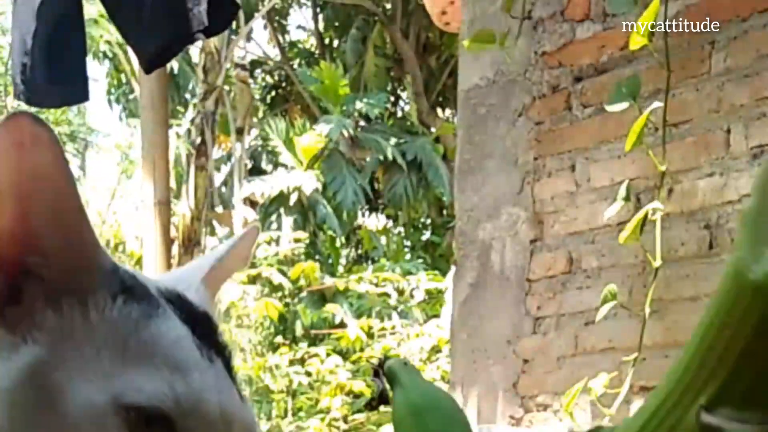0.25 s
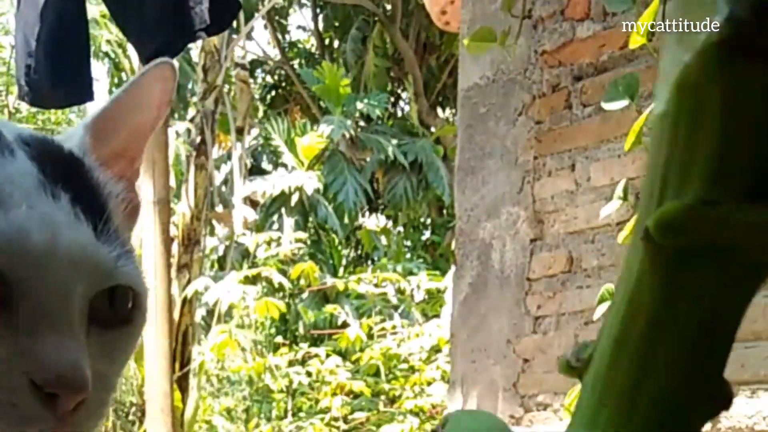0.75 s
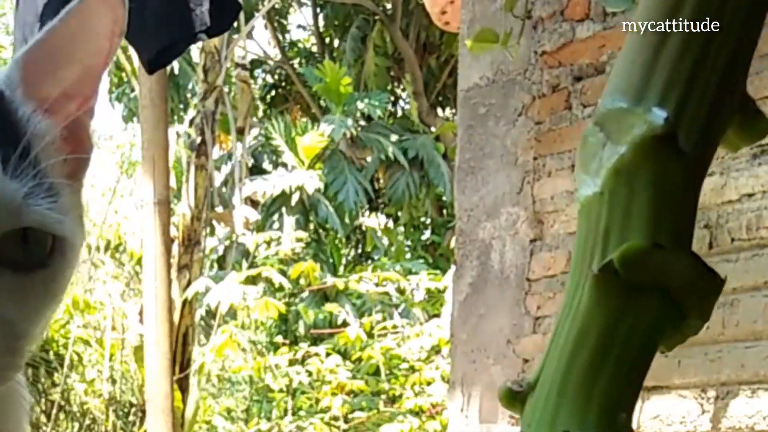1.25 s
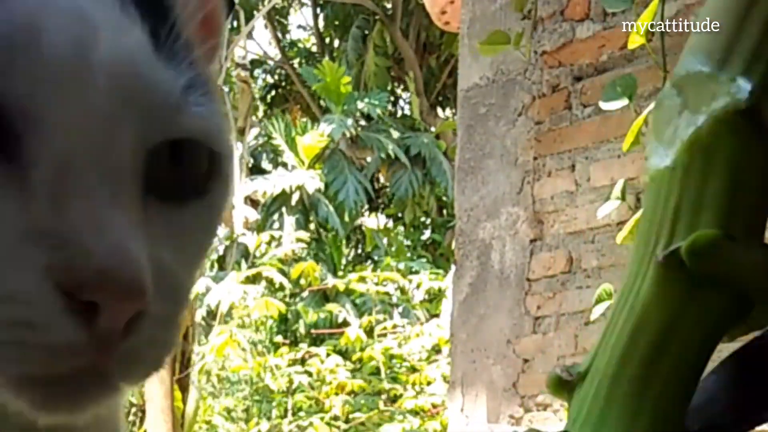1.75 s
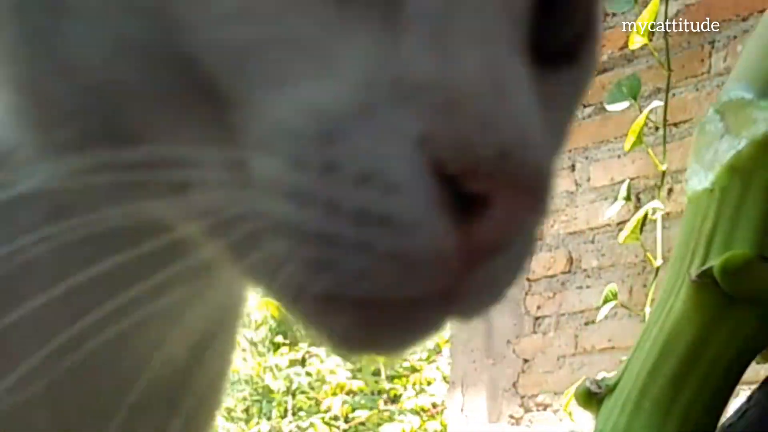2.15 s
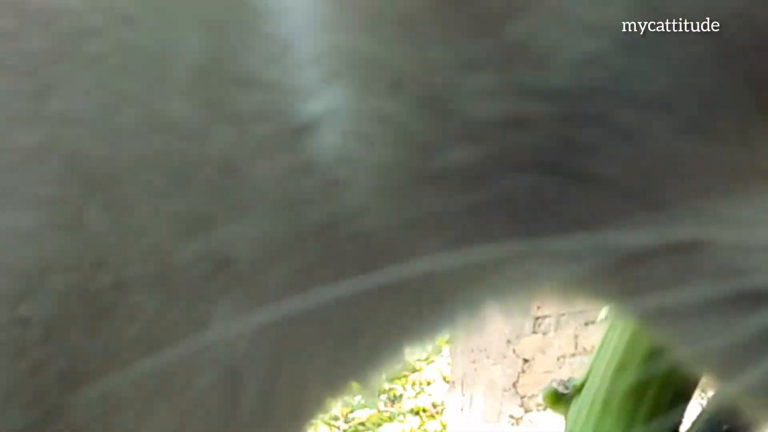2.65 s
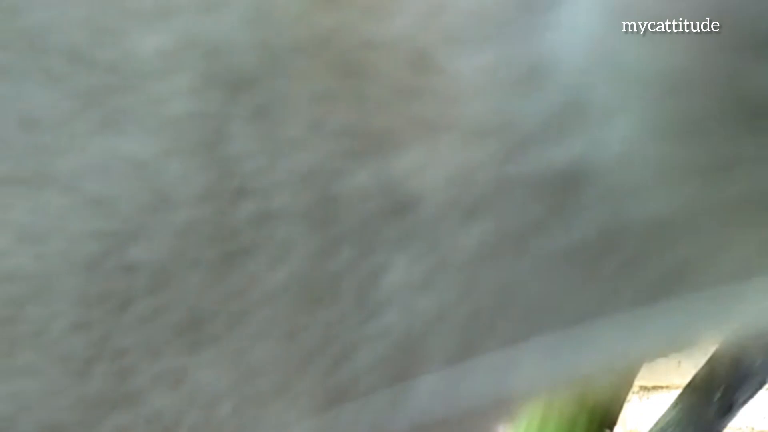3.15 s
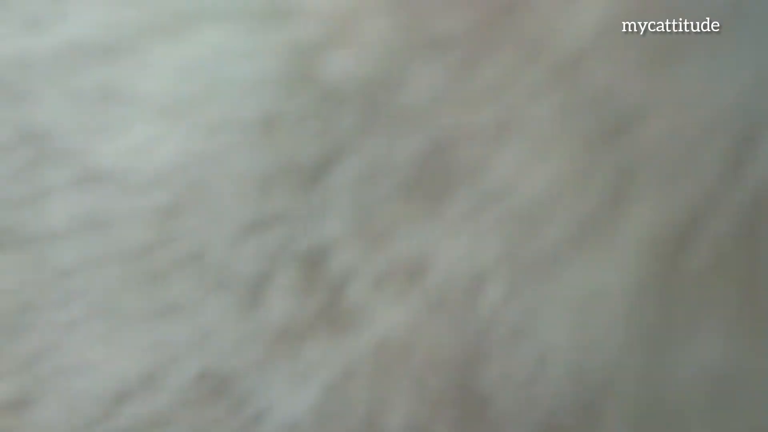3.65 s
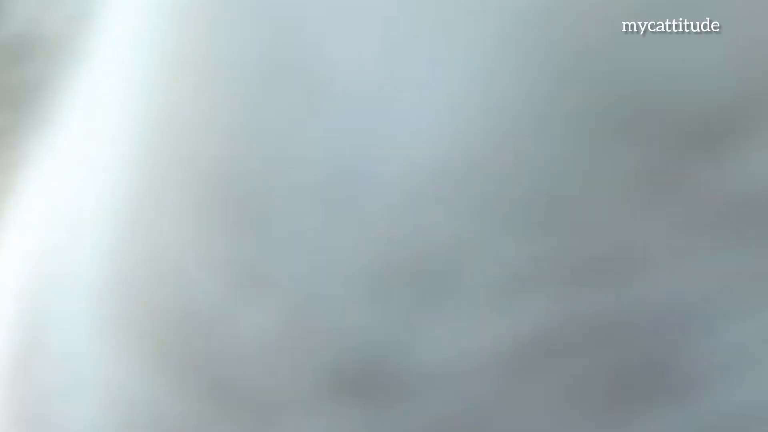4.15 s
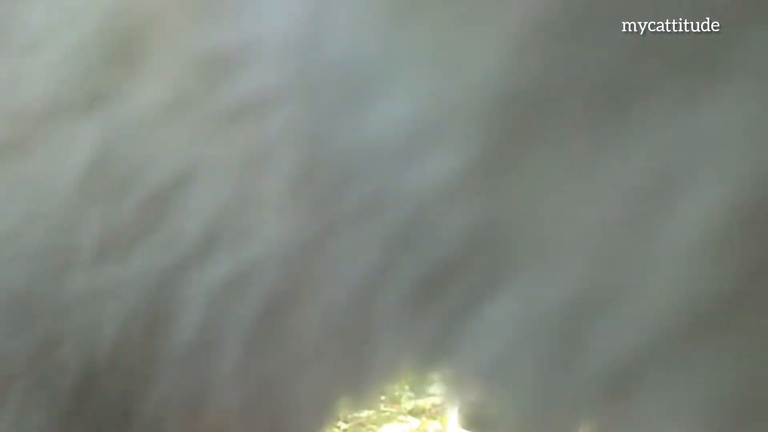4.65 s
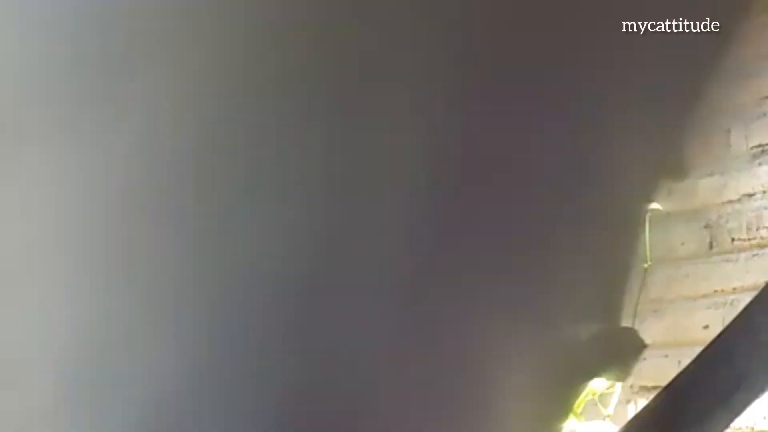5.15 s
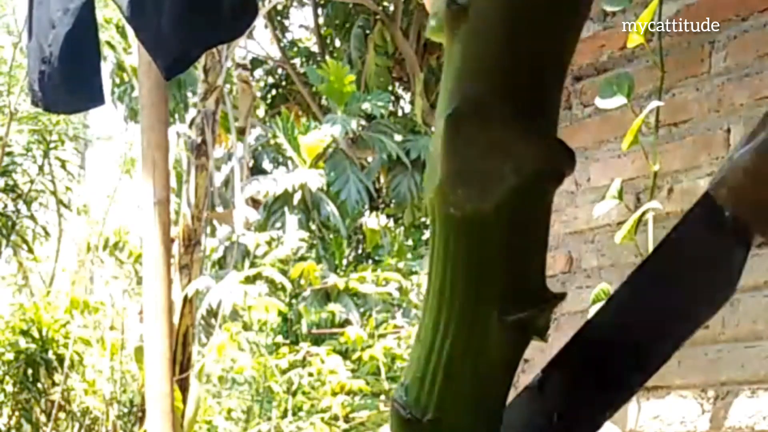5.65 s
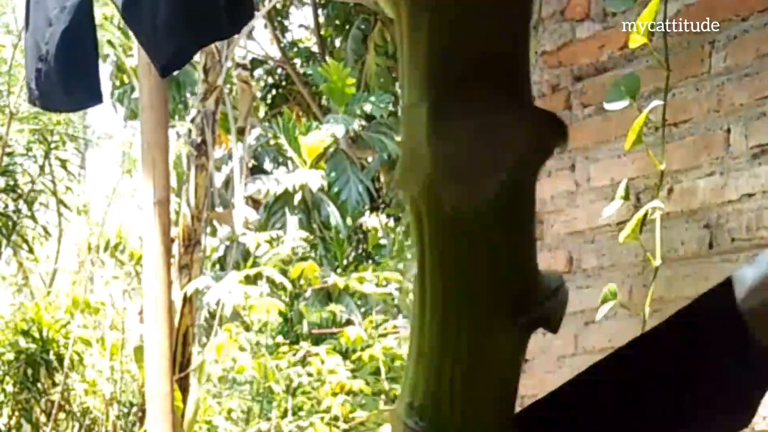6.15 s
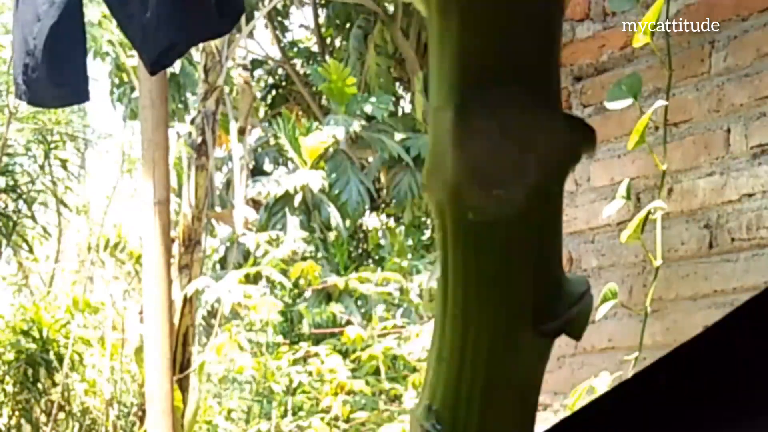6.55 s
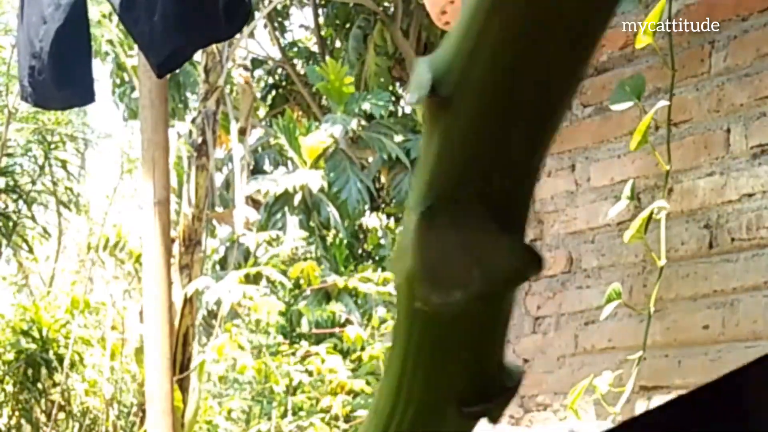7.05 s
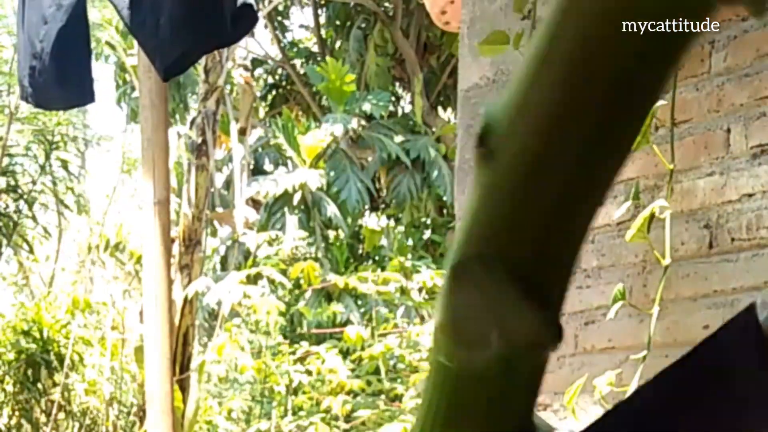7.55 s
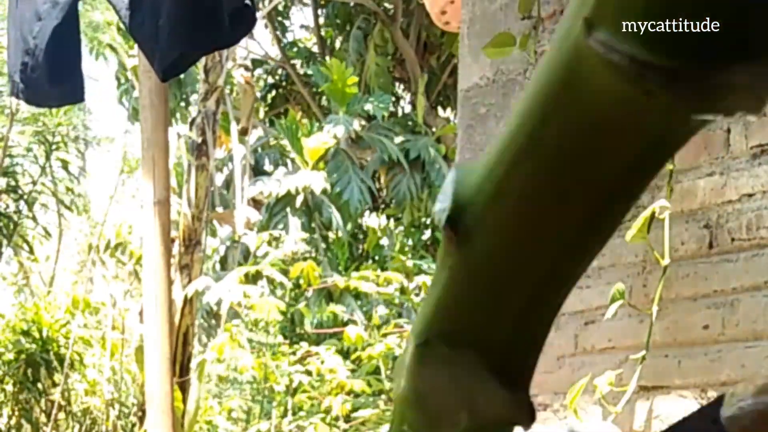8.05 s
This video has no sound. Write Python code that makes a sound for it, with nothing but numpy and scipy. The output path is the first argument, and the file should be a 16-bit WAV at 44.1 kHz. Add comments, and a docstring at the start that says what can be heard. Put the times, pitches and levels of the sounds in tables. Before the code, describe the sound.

A quiet garden yard, birds a few steps away, plant handling right at the microphone. A low hen cluck opens at 0.05 s while chicks peep in quick gliding falls, about 4.5-5.5 kHz down to 3, clearest until 1.8 s. Grainy rustles and small dry ticks come and go throughout. Rough, pulsing clucks follow at 1.5, 2.7, 3.3 and 3.5 s; peeps from 2.3 s are softer, blurred by leaves. Around 4.0-4.2 s come a cluck, sharp ticks, soft bumps and a higher, shorter cluck. Brief chips and peeps cluster at 5.3-5.8 s, weak clucks near 5.7-6.0, a fuller one at 6.2. A sharp tick at 6.35 leads into a woody, wet crunch of rapid snaps at 6.53-6.75 s. Sparse rubbing continues; peeps return from 7.9 and a last rising cluck at 8.15 s. Low handling rumbles swell over a faint steady hush.

```python
"""Hen and chicks in a garden yard

A hen clucks low and rough beside a brick wall: uneven pulses ring her throat and beak.
Her chicks peep in gliding, falling whistles, blurred by foliage, and flick out short chips.
Close by, a green stalk is handled and cut: grainy noise rustles, short bursts tick, and once it crunches
through as snaps ring the stalk. A cat brushes past the microphone, heard in the firmer strokes.
Soft bumps, a low rumble that swells with microphone movement and a faint outdoor hush complete the scene."""
import sys
import numpy as np
from scipy import signal
from scipy.fft import rfft, irfft, next_fast_len
from scipy.io import wavfile
from scipy.ndimage import uniform_filter1d

SR = 44100
rng = np.random.default_rng(int(sys.argv[2]) if len(sys.argv) > 2 else 0)


def inscribe(sig):
    """Save sig as 16-bit PCM at rate SR to the path in sys.argv[1].

    A 1-D sig is mono; a 2-D sig holds one channel per row.
    Samples are clipped to [-1, 1] before scaling.
    """
    pcm = np.round(np.clip(np.atleast_2d(sig).T, -1, 1) * 32767)
    wavfile.write(sys.argv[1], SR, pcm.astype(np.int16))


N = 366471
TIME = np.arange(N) / SR   # seconds


def from_db(db):
    """Turn decibels into a gain."""
    return 10 ** (np.asarray(db) / 20)


def rms_one(x):
    """Scale a sound so that its average strength (rms) is 1."""
    return x / np.sqrt(np.mean(x ** 2) + 1e-20)


def in_time(rows):
    """Draw straight lines between the rows of a table and read each column at every sample."""
    times, *columns = np.transpose(rows)
    return [np.interp(TIME, times, column) for column in columns]


def drift(rate_hz, size=N):
    """A random wandering around 0 with a spread of about 1; new targets come at rate_hz."""
    at = np.arange(size) * rate_hz / SR
    count = int(at[-1]) + 2
    return 1.2 * np.interp(at, np.arange(count), rng.standard_normal(count))


def colour(x, spectrum):
    """Filter a noise-like sound to follow a spectrum (pitch_hz, level_db), then set its rms to 1."""
    points_hz, points_db = np.transpose(spectrum)
    size = next_fast_len(N)
    log_hz = np.log(np.arange(size // 2 + 1) * SR / size + 1)
    below = np.maximum(np.log(points_hz[0]) - log_hz, 0)
    above = np.maximum(log_hz - np.log(points_hz[-1]), 0)
    # beyond the first and last points the level falls about 28 dB per octave
    gain_db = np.interp(log_hz, np.log(points_hz), points_db) - 40 * (below + above)
    return rms_one(irfft(rfft(x, size) * from_db(gain_db), size)[..., :N])


def noise(spectrum):
    """Steady noise with the given spectrum and an rms of 1."""
    return colour(rng.standard_normal(N), spectrum)


def resonate(x, hz, width_hz):
    """Ring a resonance that passes its own centre pitch unchanged."""
    r = np.exp(-np.pi * width_hz / SR)
    top = np.array([1, 0, -1]) * (1 - r * r) / 2
    bottom = [1, -2 * r * np.cos(2 * np.pi * hz / SR), r * r]
    return signal.lfilter(top, bottom, x + 1e-18)


def burst(start_s, t60_s):
    """An envelope that jumps to 1 and dies away by 60 dB in t60_s."""
    out, start = np.zeros(N), int(start_s * SR)
    age = TIME[:min(int(2 * t60_s * SR), N - start)]
    out[start:start + len(age)] = from_db(-60 * age / t60_s)
    return out


def swells(rows, attack_s, release_s):
    """Joint envelope of movements (start_s, length_s, level_db) that each rise, hold and die away."""
    power = np.zeros(N)
    for start, length, db in rows:
        at = np.arange(max(int(start * SR), 0), min(int((start + length + .5) * SR), N))
        age = TIME[at] - start
        rise = np.minimum(age / attack_s, 1)
        fade = np.exp(-np.maximum(age - length, 0) / release_s)
        power[at] += (from_db(db) * rise * fade) ** 2
    return np.sqrt(power)


def call_span(start, length, edge_s):
    """Sample numbers of a call, its progress from 0 to 1, and its soft-edged gate."""
    first, last = start - edge_s / 2, start + length + edge_s / 2
    at = np.arange(max(int(first * SR), 0), min(int(last * SR), N))
    to_edge_s = np.minimum(TIME[at] - first, last - TIME[at])
    gate = np.sin(np.pi / 2 * np.clip(to_edge_s / edge_s, 0, 1)) ** 2
    return at, np.clip((TIME[at] - start) / length, 0, 1), gate


# echoes from ground and wall, before each source's own echo setting: delay_s, level_db
ECHOES = [(.0068, -16), (0.0112, -16), (0.024, -22.5), (0.033, -19)]


def yard(x, echo_db, tail_db, t60_s):
    """Add echoes from ground and wall and a short, fading scatter from the foliage."""
    age = TIME[:SR // 2]
    response = rng.standard_normal(len(age)) * from_db(-60 * age / t60_s) * np.minimum(age / 0.012, 1)
    response *= from_db(tail_db) / np.linalg.norm(response)
    for delay, db in ECHOES:
        response[int(delay * SR)] += from_db(db + echo_db)
    return x + signal.fftconvolve(x, response)[:N]


# low rumbles as the microphone is moved: start_s, length_s, level_db
MICROPHONE_MOVES = [(.15, 0.24, -69), (.6, 0.24, -59), (1.2, 0.19, -66.5), (2.06, 0.14, -60.5),
                    (2.42, 0.14, -65.5), (2.85, 0.13, -62.5), (3.32, .12, -60), (3.54, 0.1, -57),
                    (4.0, 0.27, -63), (4.62, 0.16, -67), (5.04, 0.38, -65), (5.68, 0.2, -59.5),
                    (6.0, 0.46, -65.5), (6.5, 0.36, -62.5), (7.02, 0.31, -59.5), (7.5, 0.093, -63.5),
                    (8.1, 0.07, -63)]
# tone colour of the rumble: pitch_hz, relative level_db
RUMBLE_COLOUR = [(25, -43.5), (45, -2.5), (66, 0), (85, -3), (125, -13), (200, -19.5), (330, -30.5)]
# tone colour of the distant hush: pitch_hz, relative level_db
HUSH_COLOUR = [(88, -19), (150, 3.5), (248, -11), (295, -1.5), (375, -23), (446, -4), (519, -17), (588, -1),
               (667, -5), (889, 2), (1110, -5), (1540, -6), (3000, -27.5), (3900, -91), (6600, -120)]


def outdoors(floor_db=-71, hush_db=-69.5):
    """Low noise swells whenever the microphone moves, over a steady distant hush."""
    moves = swells(MICROPHONE_MOVES, attack_s=0.023, release_s=0.041)
    rumble = np.hypot(from_db(floor_db), moves)
    return rumble * noise(RUMBLE_COLOUR) + from_db(hush_db) * noise(HUSH_COLOUR)


# soft bumps on the microphone: start_s, level_db before smoothing, length_s (time to fall 30 dB)
MICROPHONE_BUMPS = [(4.054, -38, 0.073), (4.069, -47, 0.082), (4.112, -47, 0.036), (4.142, -44, 0.039),
                    (4.164, -46.5, 0.11), (6.528, -36.5, 0.13), (6.645, -49, 0.092)]
# tone colour of the bumps: pitch_hz, relative level_db
BUMP_SPECTRUM = [(40, -7), (110, 2), (280, -7.5), (800, -5), (1600, -15.5), (4000, -35), (9000, -38)]


def bumps():
    """Dull knocks carried through the microphone's body: dark noise under a soft-edged, fading envelope."""
    pressure = sum(from_db(db) * burst(start, 2 * length) for start, db, length in MICROPHONE_BUMPS)
    return noise(BUMP_SPECTRUM) * uniform_filter1d(pressure, size=260)   # smoothed over about 6 ms


def fibres(patchy_db=3.5, snaps_per_s=8.3, snap_size=8.1):
    """Friction noise in which each band flares on its own and tiny snaps ring at scattered pitches."""
    out, edges_hz = 0, np.geomspace(250, 15000, 23)
    for low, high in zip(edges_hz, edges_hz[1:]):
        snaps = np.zeros(N)
        at = rng.integers(0, N, int(snaps_per_s * N / SR))   # snaps_per_s counts each band
        snaps[at] = snap_size * rng.laplace(size=len(at))
        slips = rng.standard_normal(N) * from_db(patchy_db * drift(90)) + snaps
        band = signal.butter(2, [low, high], "band", fs=SR, output="sos")
        out = out + signal.sosfilt(band, slips)
    return out


# light, steady rubbing of stalk and leaves: time_s, hiss level_db, rasp level_db
LIGHT_RUBBING = [(0, -69, -61), (.25, -61.5, -70), (1.15, -64, -72), (1.5, -76.5, -78), (1.75, -70, -71),
                 (1.98, -95, -100), (2.4, -77, -73), (3.68, -80.5, -84), (4.1, -63.5, -78),
                 (4.52, -78, -76), (4.7, -92, -102), (5.3, -70.5, -72.5), (6.88, -66.5, -76.5),
                 (7.58, -91, -90), (7.77, -64, -69), (7.89, -81.5, -78), (8.08, -64, -72), (8.31, -72, -64)]
# firmer strokes of hand, blade and fur: start_s, length_s, hiss level_db, rasp level_db
FIRM_STROKES = [(0.183, 0.15, -65.5, -59), (0.413, .06, -61, -86), (0.54, 0.028, -58.5, -85),
                (0.714, 0.086, -60.5, -60), (0.867, 0.2, -57.5, -54), (1.265, 0.076, -66.5, -60),
                (1.348, 0.11, -71, -62), (1.607, 0.027, -52, -67), (1.66, 0.088, -79, -64),
                (2.302, 0.087, -72, -71), (2.54, 0.091, -67.5, -71), (2.709, 0.075, -65.5, -59.5),
                (2.875, 0.057, -61.5, -64), (3.206, .13, -71, -66), (3.443, 0.18, -69.5, -81),
                (3.754, 0.12, -64, -75), (4.015, .09, -60, -54), (4.144, 0.044, -59, -59),
                (4.42, 0.15, -68, -83), (4.779, 0.078, -68.5, -73.5), (5.204, 0.071, -58, -59.5),
                (5.457, .07, -61.5, -74), (5.655, 0.086, -61, -60), (5.859, 0.17, -64, -76),
                (6.071, 0.11, -60, -63), (6.303, 0.046, -62, -63), (6.445, 0.029, -54.5, -75),
                (6.526, 0.13, -66, -75), (6.746, 0.11, -56, -68), (7.083, .17, -61.5, -79),
                (7.365, 0.11, -72.5, -78), (7.64, 0.073, -59.5, -63.5)]
# tone colours of the hiss, the lower rasp and the bright crackles: pitch_hz, relative level_db
HISS_COLOUR = [(1470, -15.5), (2500, -4), (3140, -59), (4280, -31), (4710, -7), (6800, 6.5), (8230, 8),
               (10800, -5), (11200, -2.5), (14500, -7)]
RASP_COLOUR = [(300, -7.5), (900, -1), (1500, 1), (2700, 0), (3800, -0.5), (6000, -23)]
CRACKLE_COLOUR = [(2000, -10.5), (5000, -6.5), (8000, 3.5), (14000, -8.5)]


def rubbing(grain_db=0.5, stutter_db=1.3, spread=0.42, crackle_db=-10.0):
    """Fibres catch and slip: grainy hiss, a little different at each ear, with crackles, over a lower rasp."""
    light_hiss_db, light_rasp_db = in_time(LIGHT_RUBBING)
    attack_s, release_s = 0.029, 0.018
    hiss_rows = [(start, length, db) for start, length, db, _ in FIRM_STROKES]
    rasp_rows = [(start, length, db) for start, length, _, db in FIRM_STROKES]
    hiss_level = np.hypot(from_db(light_hiss_db), swells(hiss_rows, attack_s, release_s))
    rasp_level = np.hypot(from_db(light_rasp_db), swells(rasp_rows, attack_s, release_s))

    grains = from_db(grain_db * drift(1500) + stutter_db * drift(70))
    friction = fibres() * grains
    catches = (rng.random(N) < 22 / SR) * rng.uniform(.3, 1, N) ** 2   # about 22 a second
    catch_level = signal.lfilter([1], [1, -.99], catches + 1e-18)   # each dies away in a few ms
    crackle = colour(rng.standard_normal(N) * catch_level, CRACKLE_COLOUR)
    side_colour = [(4000, -34.5), (6500, 8.5), (8500, 13.5), (14000, -3.0)]   # pitch_hz, level_db
    side = colour(rng.standard_normal(N) * grains, side_colour)

    hiss = colour(friction, HISS_COLOUR) + from_db(crackle_db) * crackle
    hiss = hiss + spread * side * [[1], [-1]]   # opposite signs left and right
    return hiss_level * hiss + rasp_level * colour(friction, RASP_COLOUR)


# short scuffs of leaves and skin, and at 1.79 s a soft low tone that joins a chick's chip: middle_s, level_db,
# length_s (half of the whole swell), pitch_hz
LEAF_SCUFFS = [(0.76, -65, 0.04, 1570), (0.932, -50, 0.079, 2590), (1.028, -67, 0.069, 1560),
               (1.351, -56.5, 0.12, 2610), (1.661, -55.5, 0.057, 1300), (1.712, -60, 0.074, 1600),
               (1.79, -64, .03, 785), (2.324, -63.5, 0.09, 1144), (2.928, -68, 0.16, 1760),
               (3.59, -55.5, .03, 1740), (4.147, -50, 0.0084, 805), (7.704, -57, 0.029, 1710),
               (7.794, -62, 0.08, 1670)]


def scuffs(width_hz=440.0, grain_db=4.0):
    """Grainy slips that swell and fade in one resonance."""
    out = np.zeros(N)
    for middle, db, length, hz in LEAF_SCUFFS:
        at = np.flatnonzero(np.abs(TIME - middle) < length)
        slips = rng.standard_normal(len(at)) * from_db(grain_db * drift(307, len(at)))
        ringing = resonate(resonate(slips, hz, width_hz), hz, width_hz)
        out[at] += from_db(db) * np.hanning(len(at)) * rms_one(ringing)
    return out


# dry ticks of the stalk: start_s, level_db of the bright band, pitch_hz of its centre
STALK_TICKS = [(.879, -47, 8300), (1.05, -42.5, 6380), (1.457, -46, 9000), (1.6267, -50.5, 9500),
               (2.8593, -52, 8100), (4.0572, -33.5, 7650), (4.085, -40.5, 7500), (4.1695, -49, 6550),
               (5.1953, -42, 8400), (5.257, -46, 7330), (5.517, -40.5, 8300), (6.2833, -49, 8720),
               (6.3522, -32, 7800), (6.3599, -39, 6740), (7.229, -47.5, 10640), (7.233, -61, 9200),
               (7.293, -51.5, 9400), (7.646, -52.5, 5370), (7.6718, -57, 6800)]
# tone colour shared by the ticks and the cracks of the cut: pitch_hz, relative level_db
CRACK_COLOUR = [(800, -7.5), (2000, 2), (4000, -2.5), (7500, 1.5), (10000, -8.5), (14000, -18)]


def ticks(t60_s=0.015, width_hz=870.0, body_db=-5.5):
    """Brief cracks: noise that dies away at once, each brightest in a band of its own."""
    out, body = np.zeros(N), noise(CRACK_COLOUR)
    for start, db, hz in STALK_TICKS:
        bright = rms_one(resonate(body, min(hz, 13000), width_hz))
        out += from_db(db) * burst(start, t60_s) * (bright + from_db(body_db) * body)
    return out


# fibres snapping under the blade: start_s, strength level_db (before crack, tear and ringing gains)
FIBRE_SNAPS = [(6.533, -33), (6.538, -25), (6.542, -24), (6.548, -29), (6.568, -46), (6.591, -40),
               (6.591, -30), (6.607, -23.5), (6.623, -28.5), (6.627, -25), (6.637, -30.5), (6.6462, -21.5),
               (6.649, -46), (6.664, -31), (6.669, -21.5), (6.68, -29.5), (6.705, -29), (6.706, -31.5),
               (6.744, -38)]
# ringing tones of the hollow stalk: pitch_hz, gain level_db, t60_s (time to fall 60 dB)
STALK_TONES = [(151, -26, 0.1), (333, -26.5, 0.062), (593, -10.5, 0.011), (985, 1.5, 0.0076),
               (1170, 1.5, 0.018), (1292, -3.5, 0.012), (1680, -10.5, 0.0059), (3230, -25, 0.0073),
               (4440, -13, 0.0019)]


def cut(crack_db=-20.0, crack_t60_s=0.036, tear_db=-16.5, tear_t60_s=0.057):
    """Each snap cracks and rings the hollow stalk; smaller fibres tear after it."""
    at = [int(start * SR) for start, _ in FIBRE_SNAPS]
    sizes = from_db([db for _, db in FIBRE_SNAPS])
    tear_level = sum(from_db(db) * burst(start, tear_t60_s) for start, db in FIBRE_SNAPS)
    tearing = from_db(tear_db) * rng.standard_normal(N) * tear_level
    crack_level = sum(from_db(db) * burst(start, crack_t60_s) for start, db in FIBRE_SNAPS)
    out = from_db(crack_db) * noise(CRACK_COLOUR) * crack_level
    for k, (hz, db, t60_s) in enumerate(STALK_TONES):
        clicks = tearing / 2
        clicks[at] += sizes * from_db(rng.normal(0, 2.5, len(at)))   # every tone is struck a little differently
        r, w = from_db(-60 / (t60_s * SR)), 2 * np.pi * hz / SR
        ringing = signal.lfilter([0, np.sin(w)], [1, -2 * r * np.cos(w), r * r], clicks + 1e-18)
        out += (-1) ** k * from_db(db) * ringing
    return out


def whistles(calls, waver, flutter_db, octave_db, rasp=0.43, beak_hz=6500.0, beak_width_hz=2100):
    """Gliding tones, purest on top, raspy as they fall or strain high; the beak passes the octave in one band."""
    tone, octave = np.zeros((2, N))
    for at, hz, envelope in calls:
        strain = (hz - 4700) / 800   # starts above 4700 Hz, full 800 Hz higher
        slack = np.clip(np.maximum(3.5 * (1 - hz / hz.max()), strain), .15, 1)
        phase = 2 * np.pi * np.cumsum(hz * (1 + waver * slack * drift(253.7, len(at)))) / SR
        flutter = from_db(flutter_db * slack * drift(93, len(at)))
        level = envelope * flutter * (1 + rasp * slack * drift(600, len(at)))
        tone[at] += level * np.sin(phase)
        octave[at] += level * np.sqrt(slack) * np.sin(2 * phase)
    octave = resonate(resonate(octave, beak_hz, beak_width_hz), beak_hz, beak_width_hz)
    return tone + from_db(octave_db) * octave


# the chicks wander off behind the foliage and come back: time_s, direct level_db, scattered level_db
BEHIND_LEAVES = [(0, 0, -10), (1.9, 0, -10), (2.45, -1, -5), (2.9, -5, -1), (4.6, -5, -1), (5.2, -3, -2),
                 (6.0, -5, -1), (7.8, -2, -5), (8.3, -1, -6)]


def foliage(x, t60_s=0.12, shade_hz=5100.0, shade_width_hz=770.0):
    """Leaves and wall pass a call on along many short paths, blurring its glide; one band comes only that way."""
    direct_db, scatter_db = in_time(BEHIND_LEAVES)
    age = TIME[:SR // 3]
    fading = from_db(-60 * age / t60_s) + .1 * from_db(-60 * age / .45)   # a quick fade and a faint slower one
    paths = rng.standard_normal(len(age)) * fading
    scattered = signal.fftconvolve(x * from_db(scatter_db), paths / np.linalg.norm(paths))[:N]
    direct = x - resonate(x, shade_hz, shade_width_hz)   # the leaves shade this high band
    return direct * from_db(direct_db) + scattered


# short low chips of the chicks: start_s, length_s, foot pitch_hz, crest pitch_hz, level_db
CHICK_CHIPS = [(1.775, 0.036, 810, 863, -58.5), (4.372, 0.028, 2140, 2200, -55),
               (5.435, 0.034, 1720, 2966, -50.5), (5.576, 0.0256, 1780, 2700, -44.5),
               (5.735, 0.026, 1754, 2020, -48.5)]


def chip(start, length, foot_hz, crest_hz, db):
    """A chip is one quick arch of pitch: (samples, pitch, envelope)."""
    at, progress, gate = call_span(start, length, edge_s=0.00598)
    hz = foot_hz + (crest_hz - foot_hz) * np.sin(np.pi * progress)
    return at, hz, gate * from_db(db)


# falling peeps of the chicks: start_s, length_s, top pitch_hz, last pitch_hz,
# steepest fall (share of the length), level_db on top, level_db at the bottom
CHICK_PEEPS = [(0, 0.052, 3300, 2650, 0.49, -57, -51), (0.057, 0.23, 4500, 2950, 0.52, -52, -50.5),
               (0.324, 0.2, 5116, 2906, 0.49, -50, -53.5), (0.35, 0.17, 4530, 2550, 0.71, -45, -50),
               (0.562, .18, 5290, 2420, 0.68, -48, -46), (0.573, 0.14, 5800, 3980, 1, -58, -56),
               (0.871, 0.23, 4480, 2840, 0.47, -48.5, -49), (1.032, 0.15, 3530, 2687, 0.52, -57, -49.5),
               (1.105, 0.2, 5580, 2720, 0.72, -59, -51.5), (1.178, .16, 4563, 2820, 0.65, -41, -43.5),
               (1.493, .11, 3890, 2400, 0.55, -75, -52), (1.63, .19, 4467, 2917, 0.61, -45, -47.5),
               (1.83, 0.074, 4670, 3090, 0.52, -71.5, -70), (2.313, 0.14, 4190, 2964, 0.73, -59, -49.5),
               (2.421, .235, 4360, 2213, 0.63, -59.5, -51.5), (2.817, 0.13, 4960, 3264, 0.38, -67, -56.5),
               (3.07, 0.17, 5750, 2990, 0.43, -76, -57.5), (3.406, 0.18, 5730, 2967, 0.55, -77, -54.5),
               (3.783, 0.16, 4640, 2920, 0.91, -65.5, -59.5), (3.792, 0.1, 5490, 4700, 0.79, -55, -77),
               (3.925, .16, 5770, 3360, 0.6, -66.5, -52), (4.215, 0.14, 4860, 2820, 0.55, -58.5, -66.5),
               (4.377, 0.17, 5720, 3394, 0.64, -73.5, -50), (4.957, 0.15, 4950, 3040, .88, -69, -57.5),
               (4.958, 0.22, 5690, 3285, 0.81, -71, -54), (5.313, .15, 5720, 2864, 0.46, -68.5, -49),
               (5.35, 0.12, 4910, 3470, 0.66, -61, -70), (5.57, 0.13, 5500, 3500, 0.92, -60, -65),
               (5.625, 0.063, 4770, 2960, 0.65, -54, -70), (5.806, 0.11, 5550, 3140, .62, -68, -59),
               (6.435, 0.074, 5080, 4400, 0.66, -63, -65), (7.869, 0.16, 5730, 2880, 0.28, -79, -53),
               (8.054, 0.057, 3770, 2930, 0.37, -64, -52), (8.232, 0.096, 4730, 2800, 0.21, -55, -52.5)]


def peep(start, length, top_hz, last_hz, knee, top_db, bottom_db):
    """A peep breaks quickly downward and sags on, some with a scoop up first: (samples, pitch, envelope)."""
    scoop, scoop_s, scooped_from = .12, 0.00476, .52   # starts this share flat; only if the knee comes later
    sag_lead, sag_length, break_width = .17, .6, 0.09   # shares of the length
    break_size, top_droop = 0.23, .25   # quick break and steady sinking, relative to the slow sag
    at, progress, gate = call_span(start, length, edge_s=.012)
    sag = 1 - np.exp(-np.maximum(progress - knee + sag_lead, 0) / sag_length)
    slide = uniform_filter1d(sag, size=700, mode="nearest")   # rounded over about 16 ms
    slide = slide + break_size * np.tanh((progress - knee) / break_width) / 2 + top_droop * progress
    fallen = (slide - slide[0]) / (slide[-1] - slide[0])   # 0 on top, 1 at the bottom
    flat = scoop * (knee > scooped_from) * np.exp(-progress * length / scoop_s)
    hz = (top_hz + (last_hz - top_hz) * fallen) * (1 - flat)
    return at, hz, gate * from_db(top_db + (bottom_db - top_db) * np.sqrt(np.abs(fallen)))


# the hen's clucks: start_s, length_s, first pitch_hz, last pitch_hz, first level_db, last level_db
# (levels before the onset, catch and fade), base roughness (0 to 1), beak resonance pitch_hz
HEN_CLUCKS = [(0.053, .08, 147.2, 147, -33, -37.5, 0.4, 700),
              (1.471, 0.09, 248.8, 256.2, -33, -34, 0.77, 816),
              (2.712, 0.087, 292.8, 302.3, -30.5, -27.5, 0.49, 880),
              (3.32, 0.086, 288.7, 266, -34.5, -30.5, 0.65, 853),
              (3.524, 0.037, 300.4, 327.5, -41.5, -37, 0.45, 860),
              (3.555, 0.016, 535, 490, -37, -28, 0.35, 860),
              (4.002, 0.092, 207.1, 205.5, -33.5, -34.5, 0.58, 820),
              (4.228, 0.032, 340, 483, -34, -35, 0.2, 844), (5.729, .02, 317, 292.1, -55.5, -41, 1, 1360),
              (5.979, 0.014, 283, 295, -48.5, -41.5, 0.16, 985),
              (5.999, 0.027, 292.4, 309, -50.5, -38.5, 0.39, 1030),
              (6.175, 0.085, 303.1, 288, -32.5, -32, 0.48, 680),
              (8.152, 0.095, 224.8, 279.1, -37, -30.5, 0.46, 620)]
# resonances of her throat, each passed twice: pitch_hz (before neck changes), width_hz of one pass, level_db
HEN_THROAT = [(315, 247, -8), (424.5, 38, -1.5), (607.4, 120, -0.5), (804, 123, 2), (928, 225, 2),
              (1231, 96, -1.5), (1770, 440, -10.5), (3420, 220, -12), (4480, 490, -17.5), (6150, 230, -22),
              (7630, 1700, -35.5)]


def hen(neck=0.05, doubling=0.68, soft_hz=1176.0, beak_width_hz=340.0, bypass=0.18,
        null_hz=2400.0, null_width_hz=1820.0):
    """Syrinx pulses ring throat and beak; in rough parts they come unevenly, strong and weak in turn."""
    jitter, shimmer_db, breath = .13, 6.0, .045   # uneven timing, uneven strength, breath noise
    onset_share, onset_db = 0.24, 14.5   # the swell at the start
    release_at, release_share, release_db = 0.93, 0.17, 12.5   # the fade: loses release_db per release_share
    # past its middle a cluck catches briefly, weaker and rougher; it clears towards the end
    catch_at, catch_width, catch_db, catch_rough, clearing = .58, .12, 3, .25, 0.33
    out = np.zeros(N)
    for start, length, first_hz, last_hz, first_db, last_db, roughness, beak_hz in HEN_CLUCKS:
        at, _, gate = call_span(start, length * (1 + release_share), edge_s=.007)
        progress = np.maximum(TIME[at] - start, 0) / length
        gate = gate * from_db(-release_db * np.maximum(progress - release_at, 0) / release_share)
        catch = np.exp(-((progress - catch_at) / catch_width) ** 2)
        hz = first_hz + (last_hz - first_hz) * progress
        db = first_db + (last_db - first_db) * progress
        db = db - onset_db * np.maximum(1 - progress / onset_share, 0) - catch_db * catch
        rough = np.clip(roughness * (1 - clearing * progress) + catch_rough * catch, 0, 1)

        cycles = np.cumsum(hz * (1 + jitter * rough * drift(300, len(at)))) / SR
        pulses = np.diff(np.floor(cycles), prepend=-1)   # one click as each cycle begins
        pulses = pulses * from_db(shimmer_db * rough * rng.standard_normal(len(at)))
        pulses *= 1 - doubling * rough * (np.floor(cycles) % 2)   # every second pulse is weaker
        source = pulses + breath * rough * rng.standard_normal(len(at)) * (1 - cycles % 1)

        voice = 0
        stretch = 1 + neck * rng.standard_normal(len(HEN_THROAT))
        for (throat_hz, width_hz, throat_db), factor in zip(HEN_THROAT, stretch):
            if throat_hz > 1500:   # the upper resonances move with each pose of the neck
                throat_hz = throat_hz * factor
            ringing = resonate(resonate(source, throat_hz, width_hz), throat_hz, width_hz)
            voice = voice + from_db(throat_db) * ringing
        voice = resonate(voice, beak_hz, beak_width_hz) + bypass * voice
        voice = voice - resonate(voice, null_hz, null_width_hz)   # a side cavity swallows one band

        # high and weak notes come from smoother pulses
        softness = np.clip((hz - 320) / 130, 0, .9) + (db.max() - db) / 22
        soft = signal.sosfilt(signal.butter(2, soft_hz, fs=SR, output="sos"), voice)
        voice += np.minimum(softness, .92) * (soft - voice)
        voice /= np.sqrt(uniform_filter1d(voice ** 2, size=600) + 1e-12)   # even out, so db sets the level
        out[at] += voice * gate * from_db(db)
    return out


def scene():
    """Birds a few steps away, the stalk right at the microphone."""
    clucks = yard(hen(), echo_db=3.0, tail_db=-18.0, t60_s=0.44)
    peep_calls = [peep(*row) for row in CHICK_PEEPS]
    peeps = whistles(peep_calls, waver=0.0361, flutter_db=3.5, octave_db=-11.0)
    chip_calls = [chip(*row) for row in CHICK_CHIPS]
    chips = whistles(chip_calls, waver=.11, flutter_db=3.0, octave_db=-28.0, rasp=.8)
    chicks = yard(foliage(peeps) + chips, echo_db=-3.0, tail_db=-17.5, t60_s=0.18)
    stalk = yard(cut() + ticks(), echo_db=-12.0, tail_db=-13.0, t60_s=0.53)
    return clucks + chicks + stalk + scuffs() + bumps() + outdoors() + rubbing()


def record(dry):
    """A steep filter removes the treble above 14450 Hz."""
    return signal.sosfilt(signal.ellip(10, .2, 70, 14450, fs=SR, output="sos"), dry)


dry = scene()
out = record(dry)
inscribe(out)
```